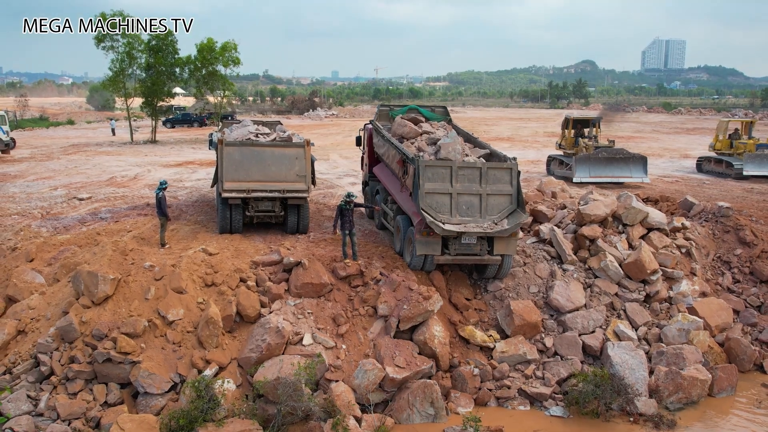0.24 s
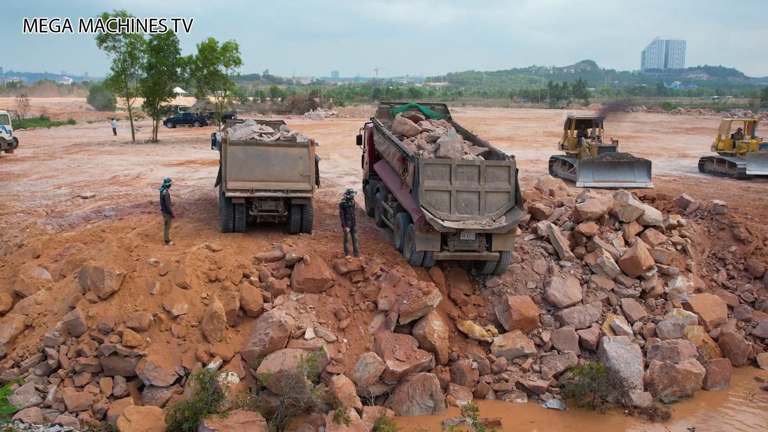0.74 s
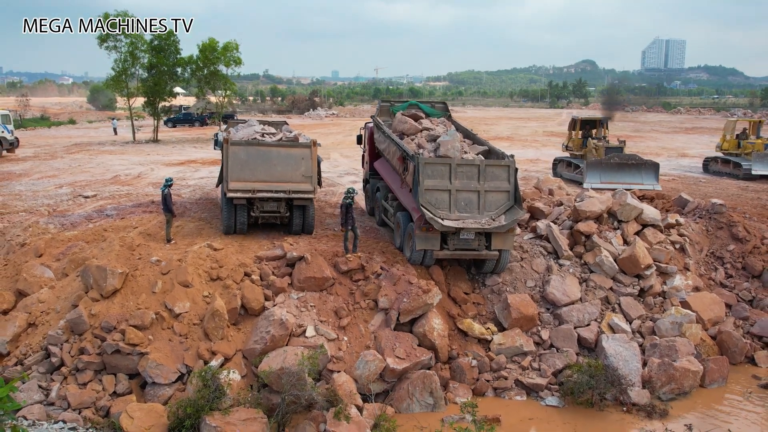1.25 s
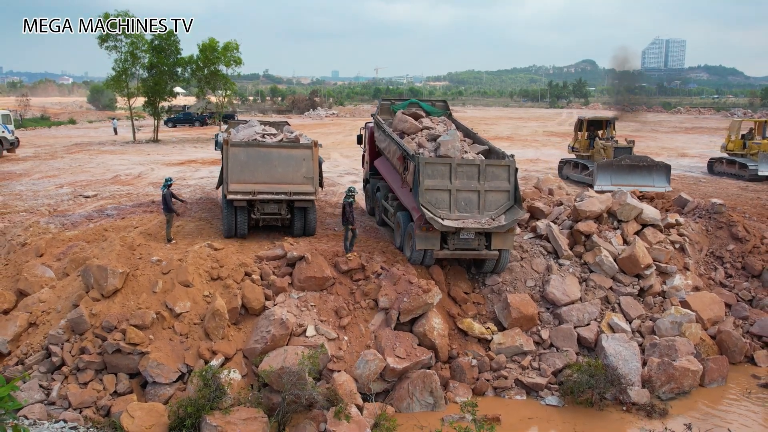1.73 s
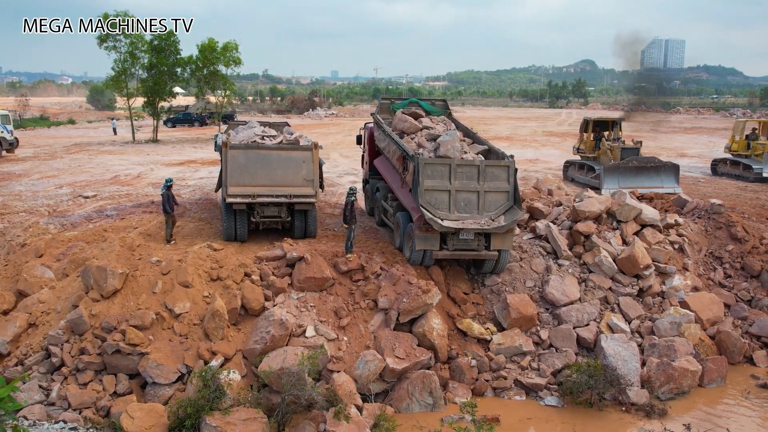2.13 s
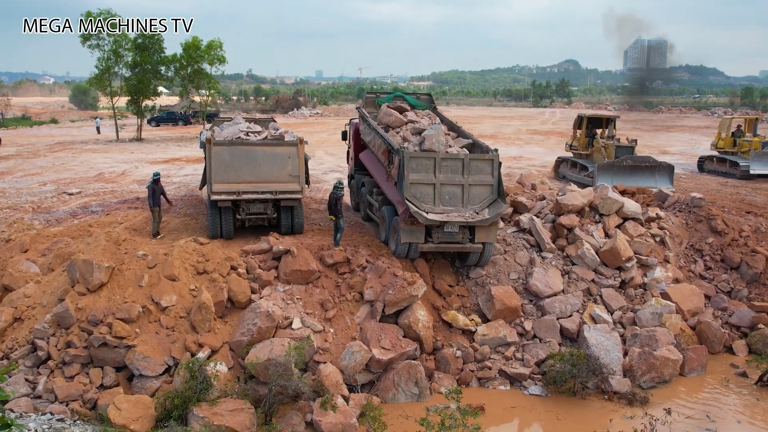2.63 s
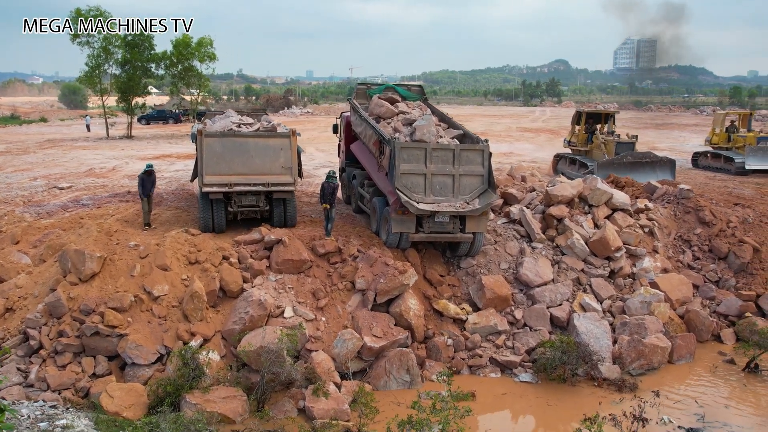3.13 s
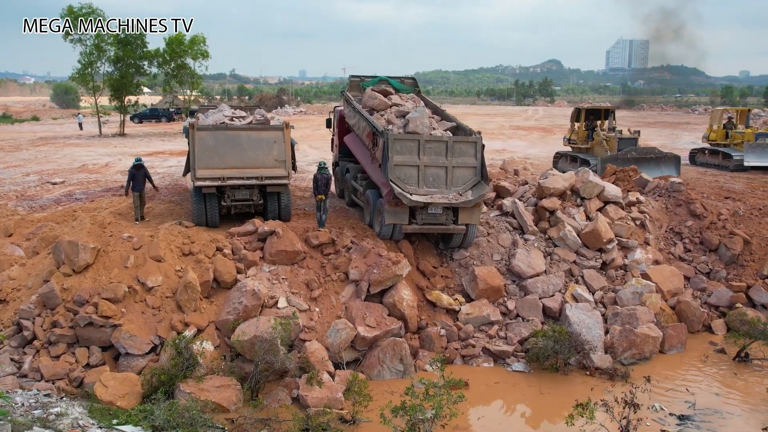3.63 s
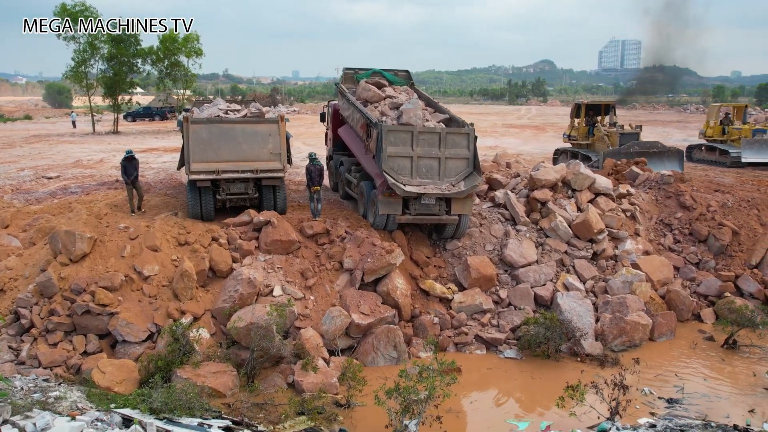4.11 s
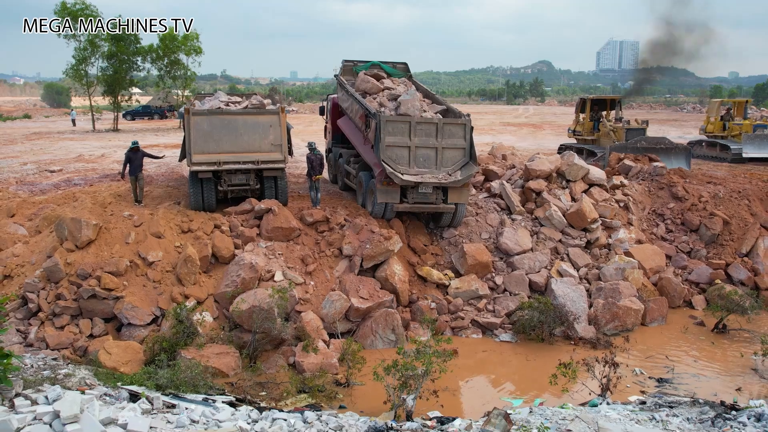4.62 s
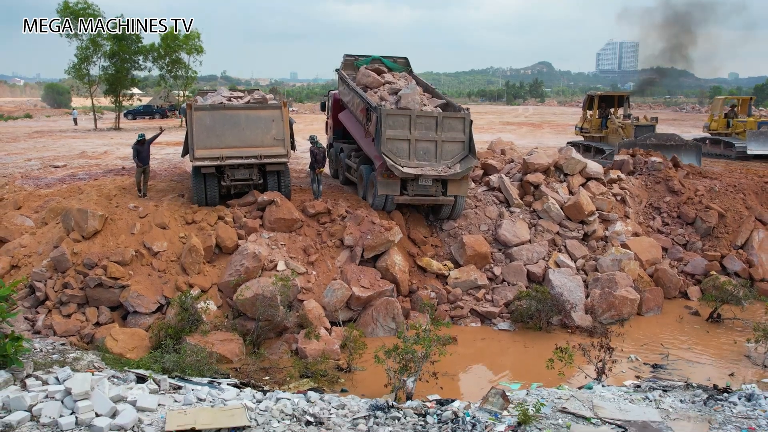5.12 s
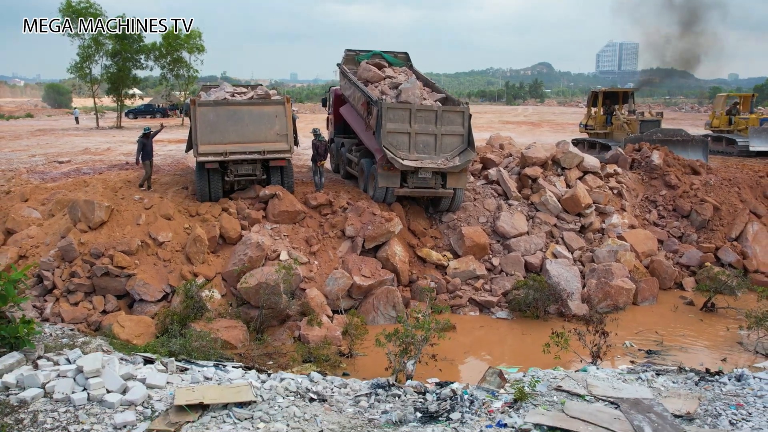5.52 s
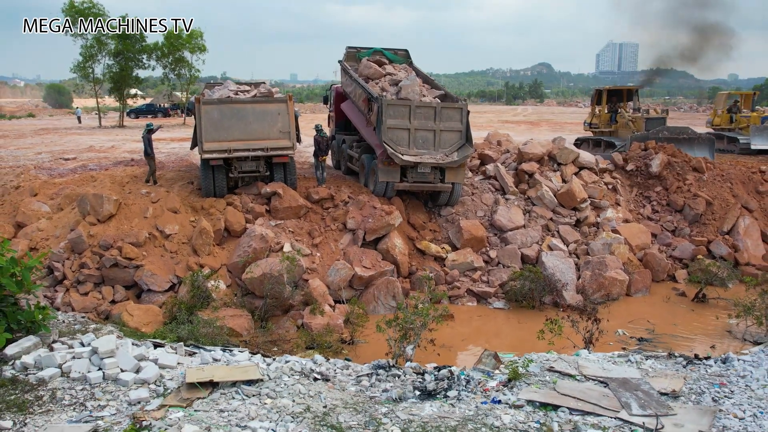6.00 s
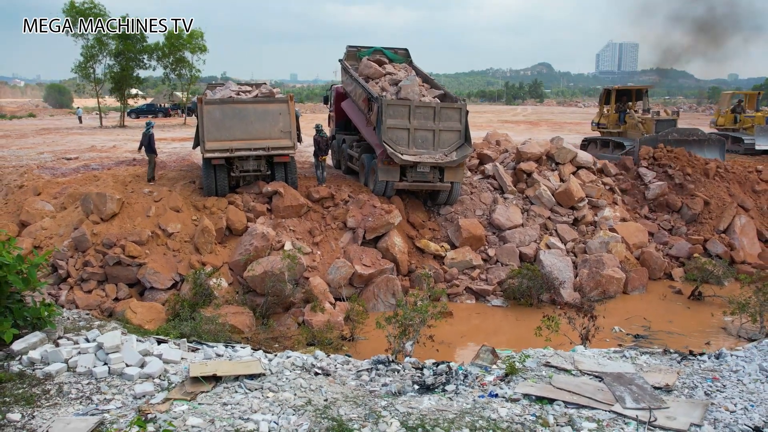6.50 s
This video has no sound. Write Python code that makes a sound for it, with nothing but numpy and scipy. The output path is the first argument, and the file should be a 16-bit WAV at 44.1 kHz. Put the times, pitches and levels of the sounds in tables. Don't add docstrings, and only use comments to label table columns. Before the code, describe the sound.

Outdoor worksite, distant wide stereo, with a constant airy engine roar. A bulldozer's diesel growls at a low pitch, then at about 0.27 s a knock sounds and the throttle lifts; the engine sags and puffs unevenly until about 1 s, then revs back up by 2 s. A sharp knock comes at 1.9. At 2.3 a low boulder thud coincides with a piercing dry steel squeal, catching twice and trailing off by 2.6. Around 2.7-2.9 short squeaks, two hard knocks and a gritty scrape cluster. The engine holds its highest drone near 4 s, fuller overall, with small squeaks around 3.4 and knocks at 3.5 and 4.6. From 4.75 it dips and pulls lower, clattering tracks denser, knocks at 4.8, 5.05, 5.3 and 5.45, brief cuts near 5.6. High squeaks chirp at 6.25; a last dip follows at 6.6. Another dozer, an idling truck and faint whines hum behind.

```python
import sys
import numpy as np
from scipy import signal
from scipy.fft import rfft, irfft, next_fast_len
from scipy.io import wavfile

SR = 44100
rng = np.random.default_rng(int(sys.argv[2]) if len(sys.argv) > 2 else 0)


def wav_record(signal):
    frames = np.transpose(np.atleast_2d(signal))
    bounded = np.clip(frames, -1, 1)
    quanta = np.round(bounded * 32767).astype(np.int16)
    wavfile.write(sys.argv[1], SR, quanta)


def level_to_linear(level):
    exponent = np.asarray(level, float) / 20
    return 10 ** exponent


N = 297675
TIME = np.arange(N) / SR
STEP = 40
COARSE = np.arange(0, N + STEP, STEP) / SR

# (frequency [Hz], left-right likeness [0-1], left minus right [dB])
PORTS = [(40, 0.83, 0.5), (150, 0.97, 0), (400, 1, 1.5), (626, 0.37, -2), (840, 0.19, 0), (1090, 0.39, -3),
         (2000, 0.38, -2), (2920, .12, 2), (4800, 0.98, -0.5), (5940, 0.32, 1), (6300, 1, -7.5),
         (7950, 0.94, 0), (12800, 1, -0.5), (14800, 0.49, 0.5)]


def rms_one(x):
    return x / np.sqrt(np.mean(x ** 2) + 1e-20)


def fine(control):
    return np.interp(TIME, COARSE, control)


def in_time(rows):
    s, *columns = np.transpose(rows)
    return [np.interp(COARSE, s, column) for column in columns]


def at_hz(points, hz, order=1):
    return np.interp(np.log(hz), np.log(np.array(points)[:, 0]), np.array(points)[:, order])


def drift(rate):
    r = np.exp(-2 * np.pi * rate * STEP / SR)
    chance = rng.standard_normal(len(COARSE) + 2000)
    return rms_one(signal.lfilter([1], [1, -2 * r, r * r], chance)[2000:])


def plateau(start, hold, rise, fall):
    before = rise * (COARSE - start)
    after = fall * (start + hold - COARSE)
    return np.minimum(0, np.minimum(before, after))


def heard(start, end):
    return np.clip(np.minimum(TIME - start, end - TIME) / 0.17, 0, 1)


def burst(start, length):
    span = slice(round(start * SR), round((start + length) * SR))
    gone = np.linspace(0, 1, span.stop - span.start)
    return span, np.clip(gone / 0.13, 0, 1) * np.sqrt(1 - gone ** 2) * level_to_linear(-5 * gone)


def bandpass(x, low_hz, high_hz):
    return signal.sosfilt(signal.butter(2, [low_hz, high_hz], "band", fs=SR, output="sos"), x)


def ring(clicks, hz, t60):
    r, w = level_to_linear(-60 / (t60 * SR)), 2 * np.pi * hz / SR
    return signal.lfilter([0, np.sin(w)], [1, -2 * r * np.cos(w), r * r], clicks + 1e-18)


def count_turns(hz):
    return np.cumsum(hz) * STEP / SR


def tone(turns, db, flutter_db):
    phase = 2 * np.pi * (turns + rng.random()) + 0.085 * flutter_db * drift(5.2)
    height = np.sqrt(2) * level_to_linear(db + flutter_db * drift(7.2))
    return fine(height) * np.sin(fine(phase))


def dozer(hz, fuelled_db, load):
    # (start [s], length [s], drop of the firing tone [dB])
    lift_offs = [
        (.265, .67, 13),
        (2.062, .005, 1.5),
        (4.758, .07, 10),
        (4.94, 0.0048, 2.5),
        (5.627, .015, 14),
        (5.7, 0.034, 2.5),
        (6.62, 0.028, 6),
    ]
    # (thirds of the firing rate [count], unloaded level [dB],
    # gain at full load [dB], share of the firing tone's swing [0-1], rise above cruising rate [dB/Hz])
    overtones = [(4, -52, 15.5, 0.25, -0.5), (5, -54.5, 12, .1, 0.73), (6, -44.5, -1.5, 0.56, .5),
                 (12, -55, 10.5, 0.62, .1)]
    # (thirds of the firing rate [count], level against mean overtone [dB])
    uneven = [(2, -18), (7, -3), (8, -10.5), (9, -5), (10, -8), (11, -9), (15, -10.5), (18, -11.5)]
    cut_s, return_s, coasting_flutter_db, cruise_hz = 0.032, 0.036, 12, 80

    cut_db = 0
    for start, length, db in lift_offs:
        cut_db = cut_db + db * np.clip(1 + plateau(start, length, 1 / cut_s, 1 / return_s), 0, 1)
    coasting = np.clip(1.5 + coasting_flutter_db * drift(13.0) / 20, 0.85, 2)
    turns = count_turns(hz)
    out = tone(turns, fuelled_db - cut_db * coasting, flutter_db=0.66)

    swing_db = fuelled_db - cut_db - fuelled_db.mean()
    over_cruise_hz = np.maximum(hz - cruise_hz, 0)
    levels_db = []
    for thirds, db, load_db, share, db_per_hz in overtones:
        level_db = db + load_db * load + share * swing_db + db_per_hz * over_cruise_hz
        levels_db.append(level_db)
        out += tone(thirds * turns / 3, level_db, flutter_db=2.6)
    mean_db = np.mean(levels_db, axis=0)
    for thirds, db in uneven:
        out += tone(thirds * turns / 3, mean_db + db, flutter_db=4)
    return out


def roar(*levels_db):
    # (frequency [Hz], level [dB per Hz])
    roar_colour = [(28, -5), (55, 3), (130, -1), (210, -2.5), (320, -7), (520, -6.5), (950, -12),
                   (1300, -10.5), (2000, -14.5), (3000, -21.5), (4600, -23.5), (6500, -24.5),
                   (10500, -26.5), (15500, -35)]
    band_edges = 25 * 2 ** np.arange(0, 9.4, 1 / 3)
    out, together = 0, drift(12)
    white = rng.standard_normal((2, 2, N))
    swell = np.array([db - db.mean() for db in levels_db])
    for k, (low, high) in enumerate(zip(band_edges, band_edges[1:])):
        mid, side = bandpass(white[k % 2], low, high)
        hz = np.sqrt(low * high)
        alike = np.clip(at_hz(PORTS, hz), 0, 1)
        bright = np.clip(np.log2(hz / 150) / 1.9, 0, 3)
        share = np.clip(1 - abs(bright - np.arange(4)), 0, 1)
        flicker_db = 0.052 * bright * together + 1.2 * drift(10.6)
        gain = fine(level_to_linear(at_hz(roar_colour, hz) + share @ swell + flicker_db))
        out = out + gain * (np.sqrt(1 + alike) * mid + np.sqrt(1 - alike) * side * [[1], [-1]])
    return level_to_linear(-32) * rms_one(resonate(out))


def resonate(x):
    # (frequency [Hz], width [Hz], level [dB])
    casing = [(198, 87, 4.5), (507, 25, 3), (785, 76, 3.5), (990, 210, -2), (1257, 320, 2), (1540, 130, -4),
              (2310, 2100, 1), (3110, 670, -1.5), (3600, 150, 4.5)]
    for hz, width_hz, db in casing:
        x = x + (level_to_linear(db) - 1) * signal.lfilter(*signal.iirpeak(hz, hz / width_hz, SR), x)
    return x


def clatter(level_db):
    # (frequency [Hz], level [dB], time to fade by 60 dB [s])
    clatter_modes = [(332.6, 9, 0.11), (597, 7.5, 0.15), (697, 4, 0.1), (767, 5, 0.088), (1117, -6, .07),
                     (1184, 13, 0.076), (1390, 2, .04), (1810, 7, .04), (1950, 1, 0.029),
                     (2164, 14.5, 0.024), (2390, -7, 0.025), (2710, 1, 0.028), (3640, 0.5, 0.048)]
    taps_per_s = 160 * fine(level_to_linear(4 * drift(6.0)))
    strength = level_to_linear(1.2 * np.minimum(rng.exponential(1, N), 4)) * rng.choice([-1, 1], N)
    taps = (rng.random(N) < taps_per_s / SR) * strength
    dealt = rng.integers(0, len(clatter_modes), N)
    out = np.zeros(N)
    for k, (hz, db, t60) in enumerate(clatter_modes):
        out += level_to_linear(db) * ring(taps * (dealt == k), hz, t60)
    return level_to_linear(level_db) * rms_one(out)


def squeals():
    # (start [s], length [s], start pitch [Hz], end pitch [Hz], level [dB])
    short_squeals = [(0.349, 0.055, 5950, 5900, -46.5), (.36, 0.03, 11900, 11830, -54),
                     (0.34, 0.038, 7900, 7880, -49), (.87, 0.032, 7700, 7720, -51),
                     (2.689, 0.04, 5120, 5046, -42.5), (2.72, 0.041, 5100, 4950, -55),
                     (2.787, .02, 6940, 7020, -40.5), (2.815, 0.043, 7120, 7060, -40),
                     (2.803, 0.049, 3120, 3145, -43.5), (2.805, 0.071, 3800, 3850, -46),
                     (2.876, .04, 6990, 6900, -44.5), (3.319, 0.048, 3600, 3600, -47),
                     (3.453, 0.06, 5694, 5800, -47), (3.456, .035, 10100, 10000, -50),
                     (5.56, 0.028, 5330, 5320, -48), (6.239, 0.038, 4857, 4817, -45.5),
                     (6.277, 0.034, 5990, 5950, -39.5), (6.315, 0.049, 4750, 4870, -52),
                     (6.345, 0.08, 4830, 4960, -49), (6.326, 0.03, 6060, 6000, -51)]
    # (start [s], hold [s], level [dB], fade [dB/s])
    long_squeal = [
        (2.305, .06, -37.5, 1400),
        (2.418, .02, -36.5, 300),
        (2.44, .115, -44, 170),
    ]
    start_pitch_hz, sag_hz_per_s, catch_db_per_s = 5496, 230, 1191

    out = np.zeros(N)
    stutter = fine(level_to_linear(2.2 * drift(60)))
    waver = 1 + 0.003 * fine(drift(80))
    for start, length, start_hz, end_hz, db in short_squeals:
        span, shape = burst(start, length)
        hz = np.linspace(start_hz, end_hz, len(shape)) * waver[span]
        phase = 2 * np.pi * np.cumsum(hz) / SR
        wave = np.sin(phase) + level_to_linear(-26) * np.sin(2 * phase)
        out[span] += np.sqrt(2) * level_to_linear(db) * shape * stutter[span] * wave

    hz = start_pitch_hz - sag_hz_per_s * (COARSE - long_squeal[0][0])
    phase = fine(2 * np.pi * count_turns(hz * (1 + 0.00098 * drift(59.8))))
    catches = [db + plateau(s, hold, catch_db_per_s, fade) for s, hold, db, fade in long_squeal]
    height = fine(level_to_linear(np.max(catches, axis=0) - 1.5 + 3.4 * drift(50.3)))
    wave = np.sin(phase) + level_to_linear(-22) * np.sin(2 * phase)
    return out + np.sqrt(2) * height * heard(2.15, 2.8) * wave


def knocks():
    # (time [s], peak level [dB], ring [Hz])
    knock_list = [(0.2673, -28, 2150), (1.9171, -29, 2070), (2.8066, -22, 1992), (2.8828, -27.5, 2020),
                  (3.5166, -28, 1841), (3.9029, -33, 2134), (4.5675, -25.5, 1978), (4.81, -25.5, 2000),
                  (5.051, -28, 2060), (5.3108, -27.5, 2027), (5.4465, -23.5, 1974), (5.5248, -37, 2030),
                  (5.9753, -35, 2027)]
    # (time [s], level [dB], ring [Hz], time to fade by 60 dB [s])
    thud = (2.316, -24, 150, .09)
    out = np.zeros(N)
    for s, db, hz in knock_list:
        crush = rng.standard_normal(400) * np.exp(-np.arange(400) / 150)
        hit = np.pad(crush, (0, 6000))
        rings = 0
        for k, ratio in enumerate((1.01, 0.72, 1.22, 1.47, 1.6)):
            rings = rings + level_to_linear(-2.5 * k) * ring(hit, ratio * hz, 0.05 * level_to_linear(-3.5 * k))
        at = round(s * SR)
        out[at:at + 6400] += level_to_linear(db - 3) * rings / abs(rings).max()
    s, db, hz, t60 = thud
    blow = (np.arange(N) == round(s * SR)) * level_to_linear(db)
    out += ring(blow, hz, t60) + ring(blow, 1.23 * hz, 0.872 * t60)
    return out + 0.6 * ring(blow, 1.33 * hz, 0.7 * t60)


def scrapes():
    # (start [s], level [dB], length [s], low edge [Hz], high edge [Hz])
    scrape_list = [(.266, -36, .014, 1500, 4200), (1.917, -50, .02, 1500, 4500),
                   (2.797, -43, .06, 1700, 6500), (2.878, -49, .035, 1700, 7500),
                   (3.125, -48, .04, 8500, 11500), (3.452, -46, .045, 4500, 12000),
                   (4.4, -54, .03, 4500, 9000), (4.575, -48, .04, 1500, 3000),
                   (5.304, -38.5, .018, 1900, 3800)]
    out, grit = np.zeros(N), rng.standard_normal(N)
    for s, db, length, low_hz, high_hz in scrape_list:
        span, shape = burst(s, length)
        out[span] += level_to_linear(db) * shape * rms_one(bandpass(grit[span], low_hz, high_hz))
    return out


def site_echo(x):
    seconds = np.arange(SR // 8) / SR
    tail = rng.standard_normal((2, SR // 8)) * level_to_linear(-60 * seconds / 0.11)
    tail = tail / np.sqrt(np.sum(tail ** 2, axis=1, keepdims=True))
    return x + level_to_linear(-1) * signal.fftconvolve(x[None], tail, axes=1)[:, :N]


def far_engines():
    # (time [s], firing rate [Hz], level [dB])
    second_dozer = [(0, 101, -35), (.4, 100, -37), (.9, 99, -33.5), (1.2, 98.5, -38), (1.7, 97, -35),
                    (2, 95, -38), (2.2, 92, -40), (2.45, 89, -46)]
    revving = [(3.1, 55, -46), (3.3, 60, -41), (3.5, 71, -40), (3.7, 76, -41), (3.9, 81, -44)]
    # (start [s], end [s], start pitch [Hz], end pitch [Hz], level [dB])
    whines = [(.2, 3, 465.5, 462, -50.5), (1.05, 2.15, 374.5, 366, -64), (1.8, 2.44, 571, 577, -53),
              (2.7, 3.62, 940.2, 1002, -45.5), (3.3, 4.2, 782, 750, -42.5), (4.2, 6.4, 463.8, 499.2, -49),
              (5.5, 6.47, 1110, 1044, -45), (5.3, 5.4, 815, 812, -33)]
    # (time [s], pitch of the hum
    # [Hz], level of the hum [dB])
    truck = [(0, 202, -39.5), (2.7, 202, -41), (3.2, 197, -39.5), (3.8, 194, -53), (4.6, 191, -53),
             (5.8, 190, -39), (6.3, 190, -41), (6.75, 190, -35.5)]
    out = np.zeros(N)
    for rows in second_dozer, revving:
        hz, db = in_time(rows)
        out += heard(rows[0][0] - 0.15, rows[-1][0]) * tone(count_turns(hz), db, flutter_db=3.1)
    for start, end, start_hz, end_hz, db in whines:
        hz = np.interp(COARSE, [start, end], [start_hz, end_hz])
        out += heard(start, end) * tone(count_turns(hz), db - 0.5, flutter_db=3.0)
    hz, hum_db = in_time(truck)
    turns = count_turns(hz)
    return out + tone(turns, hum_db, flutter_db=2.3) + tone(turns / 5, -44.5, flutter_db=1.5)


def scene():
    # (time [s], firing rate [Hz], firing tone with fuel on [dB], blade load [0-1])
    dozer_work = [(0.0, 72.05, -20.5, 0.3), (0.2, 76.55, -19, 0.96), (0.6, 69.8, -45, 0.2),
                  (0.9, 49.58, -33, 0.11), (1.25, 62.6, -23.5, 0.0), (1.6, 70.4, -20.5, 0.02),
                  (2.0, 78.57, -19, 0.2), (2.48, 83, -19.5, 0.56), (3.1, 85.35, -21.5, 0.42),
                  (4.0, 87.32, -22, 0.64), (4.38, 83.66, -24.5, 0.56), (4.72, 81.6, -22.5, .45),
                  (4.88, 76.3, -26, 0.8), (5.2, 76.1, -26, .8), (5.49, 78.93, -24.5, 0.72),
                  (6.3, 78.53, -30.5, 0.87), (6.58, 75.6, -25.5, 0.83), (6.75, 75.1, -30.5, 0.87)]
    # (time [s], level about the mean [dB])
    site_work = [(0, -1.1), (.6, -1.5), (1.2, -1.85), (1.9, -1.4), (2.4, 1.2), (2.8, 0), (3.5, 1.5),
                 (4.5, 1), (5.3, 0.35), (6.0, -0.2), (6.75, -0.8)]
    # (share of the work swing [ratio], gain at full blade load [dB])
    roar_follows = [(.1, -1.7), (1.1, -1), (0.52, 0), (1.07, -2.8)]
    hz, fuelled_db, load = in_time(dozer_work)
    work_db, = in_time(site_work)
    roar_db = [share * work_db + load_db * load for share, load_db in roar_follows]
    clatter_db = -53 + 0.34 * work_db + 8 * load
    steel = clatter(fine(clatter_db)) + squeals() + knocks() + scrapes()
    return dozer(hz, fuelled_db, load) + roar(*roar_db) + site_echo(steel) + far_engines()


def top_cut(x):
    return signal.sosfilt(signal.butter(12, 16740, fs=SR, output="sos"), x)


def record(dry):
    # (frequency [Hz], phase [radians])
    left_lag = [(0, 0), (40, .33), (90, .56), (200, .78), (550, 1.8), (950, 3.1), (1550, 3.3), (2100, 0),
                (2700, -.8), (4500, -1.5), (6000, -.35), (6950, 0), (9060, 3.14), (13300, 9.42),
                (15450, 12.6)]
    size = next_fast_len(N + 4096)
    hz = np.arange(size // 2 + 1) * SR / size
    lag = np.interp(hz, *np.transpose(left_lag))
    half = level_to_linear(at_hz(PORTS, hz + 1, order=2) / 2) * np.exp(-0.5j * lag)
    passed = (hz < 15750) / (1 + (35 / (hz + 1)) ** 12)
    ports = irfft(rfft(dry, size) * np.array([half, 1 / half]) * passed, size)[:, :N]
    return top_cut(ports)


dry = scene()
out = record(dry)
wav_record(out)
```